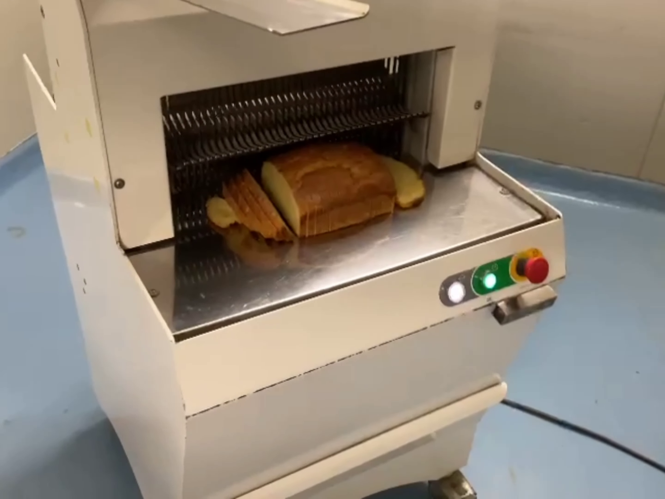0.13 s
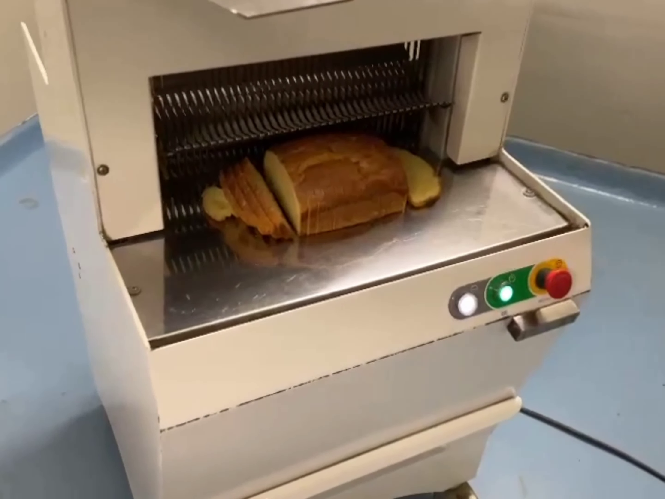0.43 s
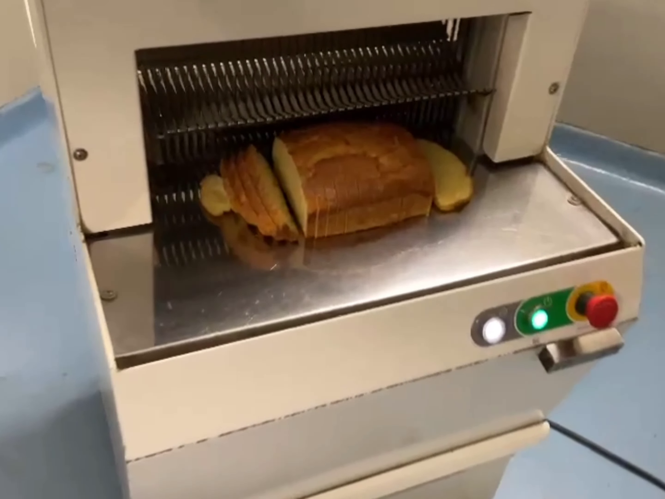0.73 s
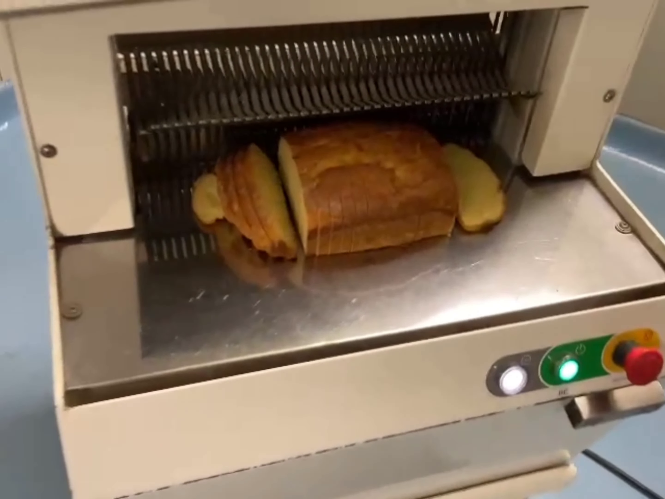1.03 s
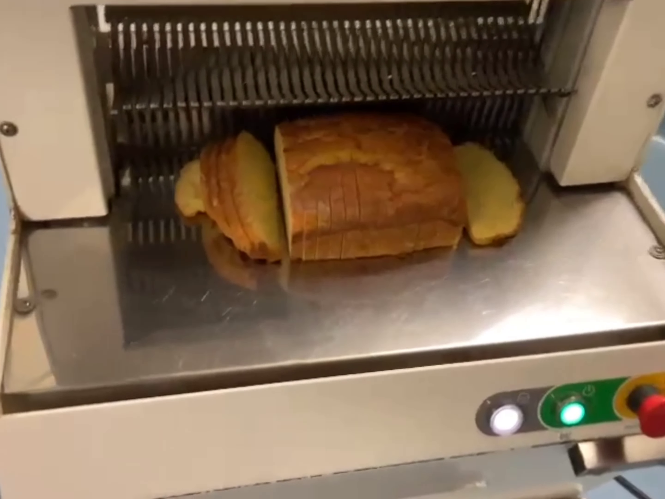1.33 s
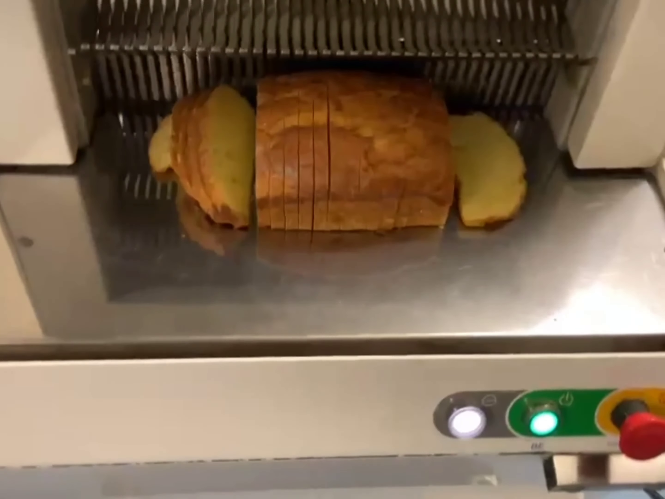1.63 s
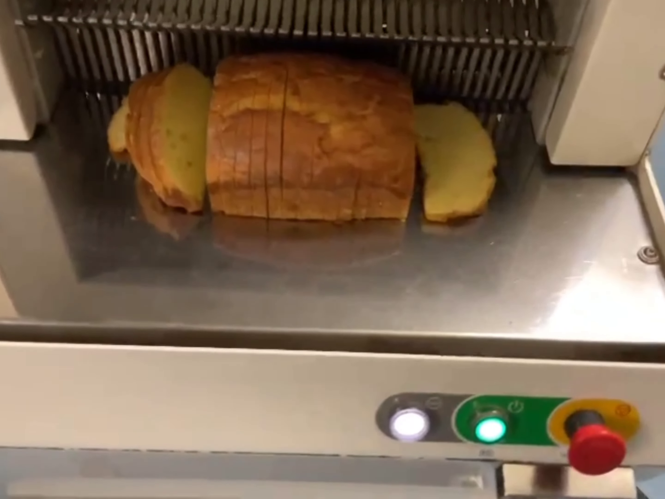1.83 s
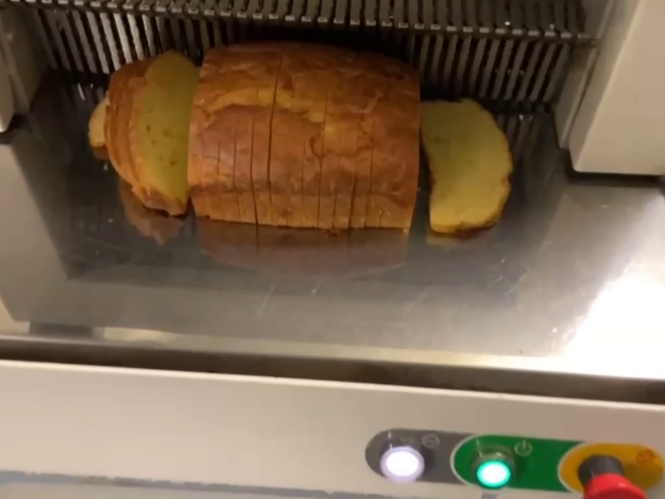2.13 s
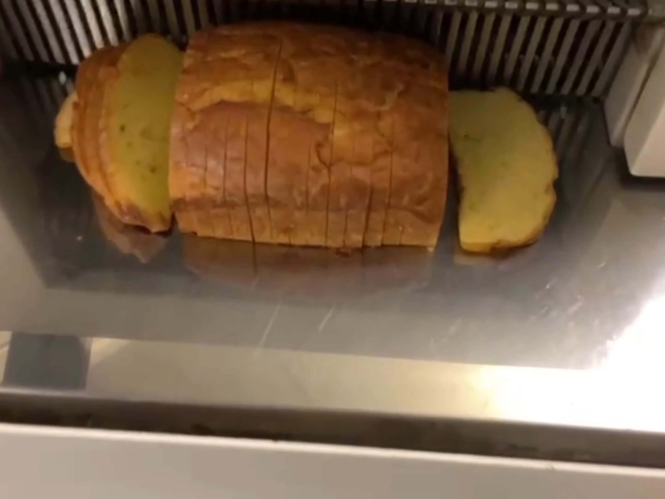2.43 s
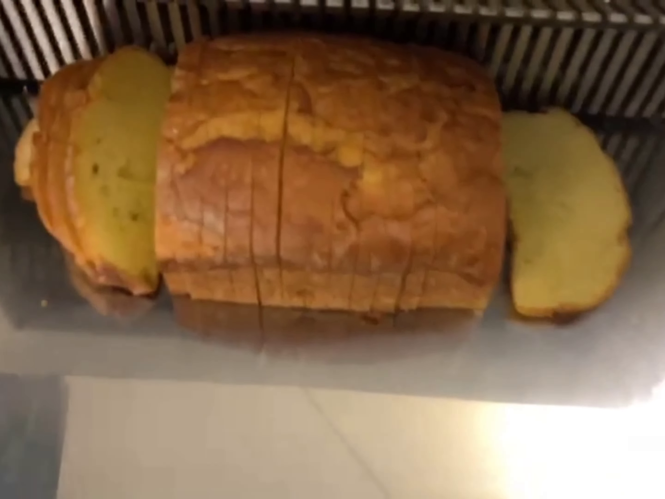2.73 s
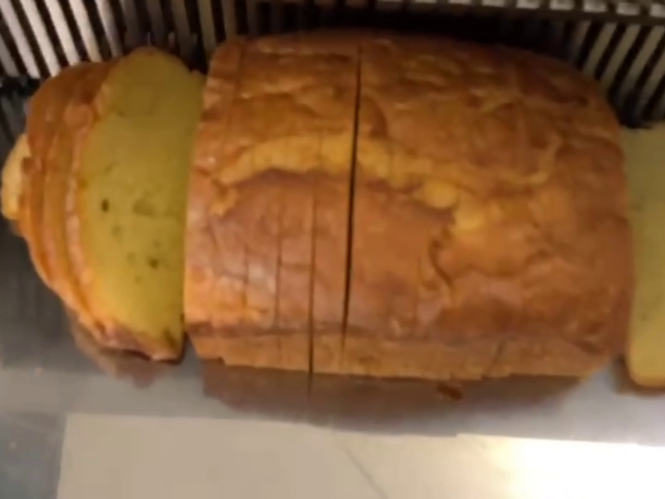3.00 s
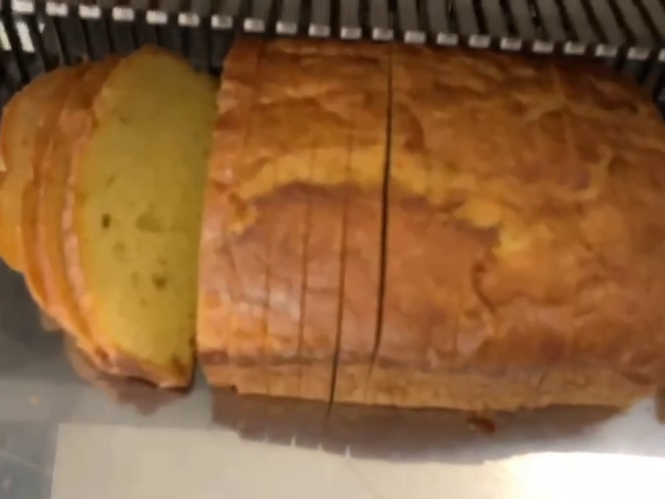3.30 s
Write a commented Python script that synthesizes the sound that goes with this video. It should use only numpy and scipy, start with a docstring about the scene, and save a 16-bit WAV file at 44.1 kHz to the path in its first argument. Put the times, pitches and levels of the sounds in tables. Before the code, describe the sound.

A bread slicing machine hums and rattles steadily, growing louder and fuller as the microphone nears.

```python
"""A bread slicer idles in a room while the microphone walks up to it.
Its mains motor hums in sines; a crank throws the blade frames to and fro about ten times a second.
Each throw loads the motor, which swells the hum, and shakes the steel cabinet: resonant and banded noise.
The blades hiss in their guides, noise and dense clicks that swell twice a turn; loose parts knock
and tick, and two thin tones waver, noise through narrow resonances."""
import sys
import numpy as np
from scipy import signal
from scipy.io import wavfile
from scipy.ndimage import uniform_filter1d

SR = 44100
rng = np.random.default_rng(int(sys.argv[2]) if len(sys.argv) > 2 else 0)


def put_to_file(sound):
    """Save the sound as 16-bit audio at rate SR, in the file named by the first command-line argument."""
    columns = np.atleast_2d(sound).T  # one column per channel
    safe = np.clip(columns, -1, 1)
    whole_steps = np.round(safe * 32767)
    wavfile.write(sys.argv[1], SR, whole_steps.astype(np.int16))


N = 152586
TIME_S = np.arange(N) / SR

HUM_HZ = 100.1
STROKE_HZ = 10.26  # turns of the crank per second
SLIDE_START_S = .025  # a moment of mid-travel, when the blades slide fastest
RIGHT_LAG_S = .00043  # sound of the left side panel reaches the right port later

# Steady hum as the microphone moves through the room:
# time_s, first_partial_rms_db, second_partial_rms_db, first_band_db (swell and cabinet near 100 Hz)
HUM_PATH = [(0, -29, -29, -32), (1, -29, -27, -31.5), (1.6, -29, -27.5, -29), (2.1, -28, -32.5, -27),
            (3, -28, -39, -24), (3.46, -28, -41, -21.5)]
# Likeness of left and right over pitch: pitch_hz, likeness (1 = same, 0 = unrelated)
LIKENESS = [(60, .95), (130, .92), (270, .72), (570, .45), (1200, .3), (2600, 0), (9200, 0), (10600, .9)]


def amp(db):
    """Amplitude factor of a level in dB."""
    return 10 ** (np.asarray(db) / 20)


def rms_one(x):
    """Scale to an rms of 1."""
    return x / np.sqrt(np.mean(x ** 2) + 1e-20)


def in_time(rows):
    """Lines drawn through the columns of a table whose first column is the time in s."""
    time_s, *columns = np.transpose(rows)
    return [np.interp(TIME_S, time_s, column) for column in columns]


def at_hz(points, hz):
    """Value at one pitch, read along a logarithmic pitch axis."""
    pitch_hz, values = np.transpose(points)
    return np.interp(np.log(hz), np.log(pitch_hz), values)


def drift(rate_hz):
    """Random wander with rms 1: noise through two equal low-pass poles, run at one step in 40 samples."""
    r = np.exp(-80 * np.pi * rate_hz / SR)
    slow = signal.lfilter([1], [1, -2 * r, r * r], rng.standard_normal(N // 40 + 2002))
    slow = slow[2000:]  # the filter has settled
    return np.interp(np.arange(N) / 40, np.arange(len(slow)), rms_one(slow - slow.mean()))


def resonate(x, hz, width_hz):
    """Two-pole resonance, gain 1 on top."""
    r = np.exp(-np.pi * width_hz / SR)
    zeros = np.array([1, 0, -1]) * (1 - r * r) / 2
    poles = [1, -2 * r * np.cos(2 * np.pi * hz / SR), r * r]
    return signal.lfilter(zeros, poles, x)


def bandpass(x, low_hz, high_hz):
    """Gentle band-pass filter."""
    return signal.sosfilt(signal.butter(2, [low_hz, high_hz], "band", fs=SR, output="sos"), x)


def banded_noise(spectrum, patchy, per_octave, tilt=None):
    """Stereo noise in narrow bands, each with its own level, flicker, likeness and balance; middle rms 1."""
    # Lean of the sound between the ports: pitch_hz, left_minus_right_db
    balance = [(100, -2.1), (300, -1.5), (600, 3), (1200, 0.8), (2500, 0)]
    low_hz, high_hz = spectrum[0][0], spectrum[-1][0]
    edges = np.geomspace(low_hz, high_hz, int(per_octave * np.log2(high_hz / low_hz)) + 2)
    white = rng.standard_normal((2, 2, N + SR // 4))  # neighbouring bands use different noise
    out = 0
    for k, (a, b) in enumerate(zip(edges, edges[1:])):
        mid, side = bandpass(white[k % 2], a, b)[:, -N:]
        hz = np.sqrt(a * b)
        alike = np.clip(at_hz(LIKENESS, hz), -1, 1)
        lean_db = at_hz(balance, hz) / 2
        level_db = at_hz(spectrum, hz) + patchy * (.5 * drift(.99) + 2.06 * drift(25.0))
        if tilt is not None:
            level_db = level_db + tilt(hz)
        pair = np.sqrt(1 + alike) * mid + np.sqrt(1 - alike) * side * [[1], [-1]]
        out = out + amp(level_db) * amp([[lean_db], [-lean_db]]) * pair
    return out / np.sqrt(np.mean(np.mean(out, axis=0) ** 2))


def crank_load():
    """Each turn loads the motor at the throw and, more weakly, at the return; peak about 1."""
    # Load in one crank turn: delay_s, rise_s, fall_s, level_db
    throws = [(0, .011, .013, 0), (.048, .008, .012, -12)]
    first_throw_s, spread_db, jitter_s = .0445, 1.2, .001
    load = np.zeros(N)
    turns = np.arange(-1, N / SR * STROKE_HZ)
    luck = rng.standard_normal((len(turns), len(throws), 2))
    for turn, row in zip(turns, luck):
        for (delay, rise, fall, db), (early, strong) in zip(throws, row):
            s = first_throw_s + turn / STROKE_HZ + delay + jitter_s * early
            i = slice(max(int((s - .04) * SR), 0), max(int((s + .1) * SR), 0))
            since = TIME_S[i] - s
            push = np.where(since < 0, np.exp(-(since / rise) ** 2), np.exp(-np.abs(since) / fall))
            load[i] += amp(db + spread_db * strong) * push
    return load


def slide_cycle():
    """The blades slide fastest twice a crank turn, at mid-travel: a cosine between -1 and 1."""
    return np.cos(4 * np.pi * STROKE_HZ * (TIME_S - SLIDE_START_S))


def strokes():
    """Contacts bunch twice a turn, at mid-travel; mean 1."""
    return 1 + .61 * slide_cycle()


def clicks(per_s, shape):
    """Random clicks of uneven size and either sign, rms 1."""
    sizes = amp(3.5 * np.minimum(rng.exponential(1, shape), 3)) * rng.choice([-1, 1], shape)
    return rms_one((rng.random(shape) < per_s / SR) * sizes)


def whine():
    """Thin wavering tones: noise twice through a narrow resonance."""
    # Thin tones: pitch_hz, rms_db, width_hz (of each pass)
    thin_tones = [(715, -40.5, 14), (2324, -59, 8)]
    out = 0
    for hz, db, width in thin_tones:
        once = resonate(rng.standard_normal(N), hz, width)
        out = out + amp(db) * rms_one(resonate(once, hz, width))
    return out


def rumble(beat, rattle_db):
    """Low banded noise of the cabinet that follows the rattle level and lifts at each throw."""
    # Relative spectrum: pitch_hz, density_db (per Hz)
    low_spectrum = [(22, -49), (43, -34), (57, -49), (72, 6.5), (100, -5.5), (160, -14.5), (200, 5),
                    (240, -2.5), (350, -6.5), (460, -13), (520, -38.5)]
    noise = banded_noise(low_spectrum, patchy=1.0, per_octave=4)
    return amp(rattle_db + 2.5 + 2.5 * beat) * noise


def cabinet(beat, bands_db):
    """Noise rings the steel panels, harder at each throw; partly unlike left and right."""
    # Noisy cabinet resonances: pitch_hz, width_hz, level_db (over the band), lift_db (per unit of beat)
    resonances = [(108, 60, -5, 4), (149.8, 41, 2, 1), (277.4, 55, -1, 2), (396, 30, -3, 1)]
    out = 0
    for (hz, width, db, lift_db), band_db in zip(resonances, bands_db):
        mid, side = (rms_one(resonate(resonate(v, hz, width), hz, 1.01 * width))
                     for v in rng.standard_normal((2, N)))
        alike = at_hz(LIKENESS, hz)
        lift = rms_one(amp(lift_db * beat))
        pair = mid + np.sqrt((1 - alike) / (1 + alike)) * side * [[1], [-1]]
        out = out + amp(db + band_db) * lift * pair
    return out


def rattle(beat, rattle_db):
    """Panels rattle as banded noise, lifted at each throw; the left side panel adds a steadier layer."""
    # Relative spectrum: pitch_hz, density_db (per Hz)
    panel_spectrum = [(260, -27), (450, 1), (712, 1), (868, -3), (947, -1.5), (1120, -8), (1550, -7.5),
                      (1890, -23.5), (2200, -11), (2860, -55)]
    front = amp(rattle_db - .5 + 1.0 * beat) * banded_noise(panel_spectrum, patchy=1.1, per_octave=5)
    aside = amp(rattle_db - 2.5) * banded_noise(panel_spectrum, patchy=1.1, per_octave=5)
    return front + [aside[0], np.roll(aside[1], round(RIGHT_LAG_S * SR))]


def knocks(rattle_db):
    """Loose parts knock a panel on the left; every knock strikes each mode with its own strength."""
    # Panel modes: pitch_hz, level_db, t60_s
    panel_modes = [(400, -3, .08), (583, 0, .05), (715, -1, .05), (805, -2, .04), (938, -3, .03),
                   (1337, -5, .03)]
    # Harder knocks: start_s, level_db (before the mode level and its chance strength)
    hard_knocks = [(.207, -22), (.809, -24), (.821, -21), (.828, -21), (2.267, -27), (2.276, -23),
                   (2.314, -23), (2.437, -24)]
    start_s, hard_db = np.transpose(hard_knocks)
    blows = np.zeros(N)
    blows[(start_s * SR).astype(int)] = amp(hard_db)
    light = clicks(240 * strokes(), N)  # 240 light knocks a second on average
    luck = rng.standard_normal((len(panel_modes), N))
    soft, hard = 0, 0
    for (hz, db, t60), own in zip(panel_modes, luck):
        r, w = amp(-60 / (t60 * SR)), 2 * np.pi * hz / SR
        struck = amp(db) * np.array([light * own, blows * amp(2 * own)]) + 1e-18
        soft_ring, hard_ring = signal.lfilter([0, np.sin(w)], [1, -2 * r * np.cos(w), r * r], struck)
        soft, hard = soft + soft_ring, hard + hard_ring
    ring = amp(rattle_db - 8) * rms_one(soft) + hard
    return np.array([ring, amp(-6) * np.roll(ring, round(RIGHT_LAG_S * SR))])


def ticks():
    """Loose parts tick: short bright noise bursts that die fast, unlike left and right."""
    # Ticks: start_s, level_db (first level, before the noise is band-passed)
    tick_list = [(0.955, -34.5), (1.0425, -31), (1.0825, -31), (3.1857, -30), (3.2444, -38)]
    t60_s = .06
    shape = np.zeros(N)
    for s, db in tick_list:
        shape += amp(db - 60 * np.clip(TIME_S - s, 0, 1) / t60_s) * (TIME_S >= s)
    return shape * bandpass(rng.standard_normal((2, N)), 3500, 11500)


def chatter():
    """Dense clicks, bunched at mid-travel, ring the blades; each mode has its own, in each channel."""
    # Ringing modes of the blades: pitch_hz
    blade_modes = [2430, 2925, 3505, 3995, 4730, 5500, 6550]
    rings = 0
    for hz in blade_modes:
        contacts = clicks(350 * strokes(), (2, N))  # 350 clicks a second on average
        rings = rings + resonate(contacts, hz, width_hz=116)
    return amp(-3) * rms_one(rings)


def hiss():
    """Blades sliding in their guides: noise and chatter, brighter when the microphone faces them."""
    # Hiss on the way in: time_s, level_db (before trim and swell), top_octave_db (only its swing counts)
    hiss_path = [(0.08, -45.5, -24.5), (0.67, -47.5, -21.5), (0.69, -43, -30.5), (1.02, -44, -18.5),
                 (1.05, -38.5, -11.5), (1.17, -40.5, -26), (1.24, -40, -13), (1.51, -44, -16.5),
                 (1.64, -45, -5.5), (1.87, -41.5, -12.5), (2.21, -45, -14), (2.31, -41, -15.5),
                 (3.0, -41.5, -16.5), (3.2, -35, -11.5), (3.31, -37, -25), (3.32, -42, -18.5),
                 (3.46, -39, -26)]
    # Relative spectrum of the sliding blades: pitch_hz, density_db (per Hz)
    blade_spectrum = [(1500, -8), (2000, -1), (3300, 2.5), (4400, -3), (5600, -1), (6200, -6), (7200, -7),
                      (8200, -14), (10500, -14), (11300, -18), (12500, -21)]
    level_db, top_db = in_time(hiss_path)
    swell_db = .5 * slide_cycle()
    bright_db = top_db - top_db.mean() + swell_db

    def tilt(hz):
        """Brightness acts from 3500 Hz up and in full 1.8 octaves higher."""
        return np.clip(np.log2(hz / 3500) / 1.8, 0, 1) * bright_db

    noise = banded_noise(blade_spectrum, patchy=1.3, per_octave=5, tilt=tilt)
    trim_db = 1
    return amp(level_db + trim_db + .2 * swell_db) * (noise + chatter())


def hum(load, bands_db):
    """Clean motor partials; every throw swells them, some pushed one crank order aside."""
    # Phase lag of the two steady partials: lag_rad
    partial_lags = 2.0, 1.4
    # Swells at each throw: hum_multiple, shift_crank_orders, lag_rad, delay_s
    swells = [(1, 1, .6, 0), (2, 0, 1.4, 0), (3, -1, 2.3, .006), (4, 0, 2.4, .008)]
    # Mean level of each swell: level_db (over its band)
    swell_levels = [0, -4, -11, -7]
    # Steady side tones: hum_multiple, shift_crank_orders, level_db (over its partial), lag_rad
    side_tones = [(1, -1, -6, -1.5), (2, -2, -11, 2.5)]

    def tone(multiple, shift, lag):
        hz = multiple * HUM_HZ + shift * STROKE_HZ
        return np.cos(2 * np.pi * hz * TIME_S - lag)

    path_db = in_time(HUM_PATH)
    out = 0
    for k, (db, lag) in enumerate(zip(path_db, partial_lags)):
        out = out + amp(db) * tone(k + 1, 0, lag)
    for (k, shift, lag, delay), db, band_db in zip(swells, swell_levels, bands_db):
        late_load = np.interp(TIME_S - delay, TIME_S, load) / load.mean()
        out = out + amp(db + band_db) * late_load * tone(k, shift, lag)
    for k, shift, db, lag in side_tones:
        out = out + amp(db + path_db[k - 1]) * tone(k, shift, lag)
    return np.sqrt(2) * out  # levels count as rms


def scene():
    """The layers of the slicer, with levels that follow the microphone on its way in."""
    # Band levels on the way in: time_s, near_145_hz_db, near_280_hz_db, near_395_hz_db, panel_rattle_db
    near_path = [(0, -34, -31.5, -30.5, -31.5), (.6, -32.5, -28, -33.5, -33.5),
                 (.82, -29, -27.5, -28, -30.5), (1.05, -36, -31, -36, -31.5), (1.3, -27, -25, -31, -31),
                 (2.15, -33.5, -29.5, -36, -31), (2.33, -26.5, -33, -27, -27), (2.65, -33, -25, -29.5, -30),
                 (3.0, -27.5, -18.5, -25, -29), (3.15, -38, -21.5, -26.5, -26),
                 (3.42, -25, -28, -26, -28.5)]
    *upper_bands_db, rattle_db = in_time(near_path)
    bands_db = [in_time(HUM_PATH)[2], *upper_bands_db]
    load = crank_load()
    beat = uniform_filter1d(load, size=600, origin=200)  # smoothed over 14 ms, 4.5 ms late
    body = (whine() + hum(load, bands_db)) * amp([[-.2], [.2]])  # a touch louder on the right
    shaken = rumble(beat, rattle_db) + cabinet(beat, bands_db) + rattle(beat, rattle_db)
    return body + shaken + knocks(rattle_db) + ticks() + hiss()


def record(dry):
    """The microphone channel rounds peaks below .85, then cuts the top steeply at 11.6 kHz."""
    top = .85
    rounded = top * np.tanh(dry / top)
    return signal.sosfilt(signal.ellip(10, .5, 75, 11600, fs=SR, output="sos"), rounded)


dry = scene()
out = record(dry)
put_to_file(out)
```